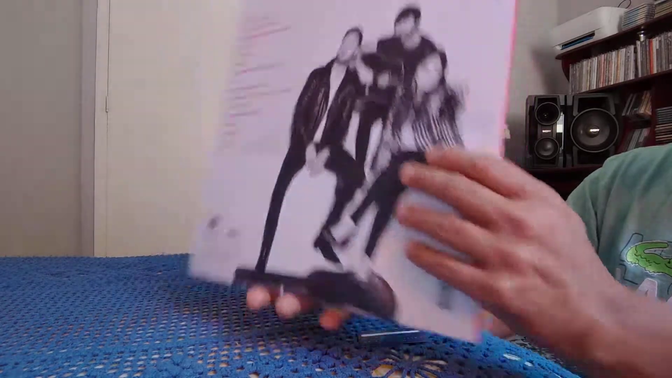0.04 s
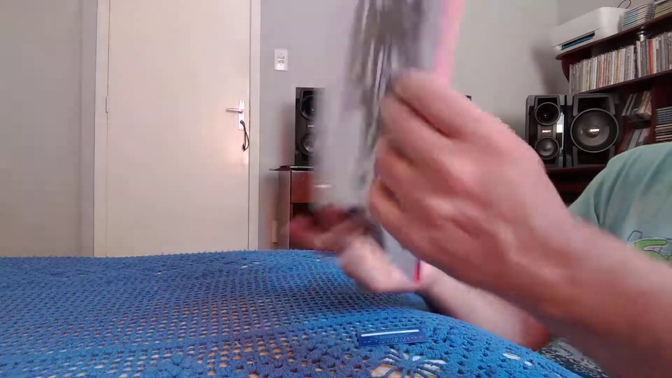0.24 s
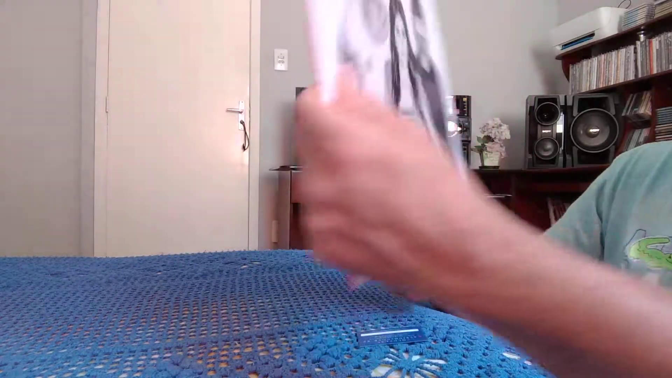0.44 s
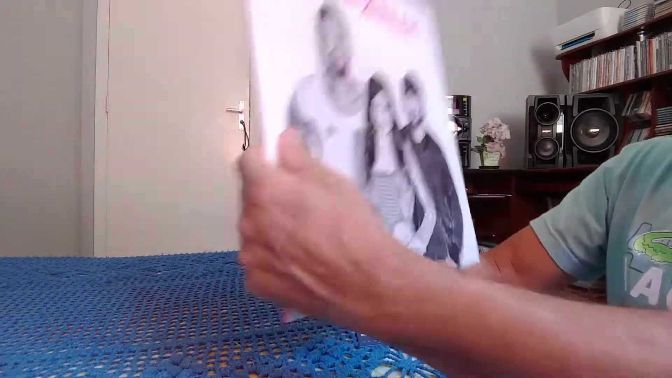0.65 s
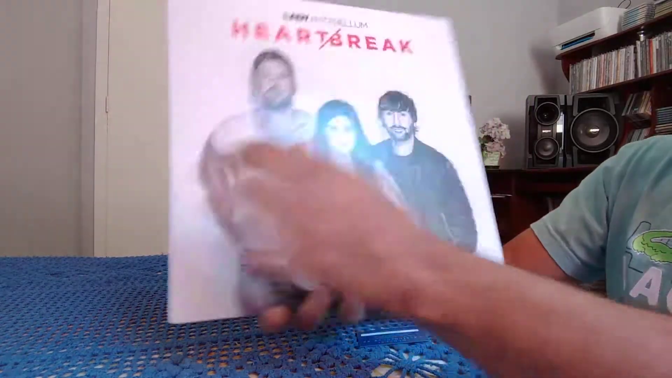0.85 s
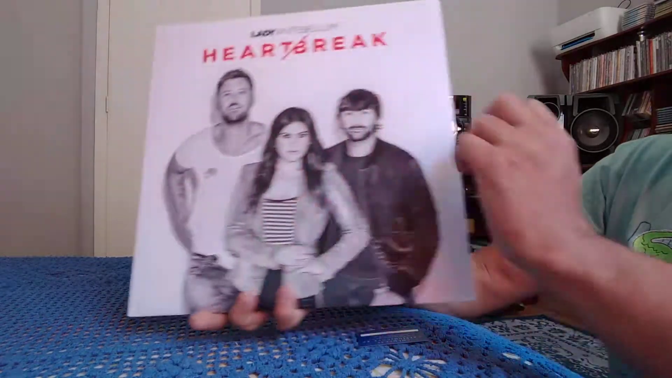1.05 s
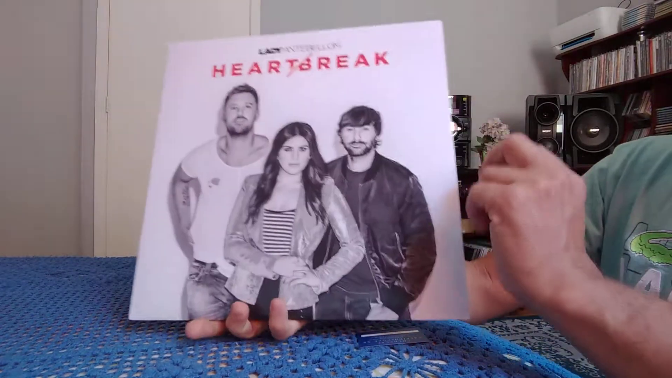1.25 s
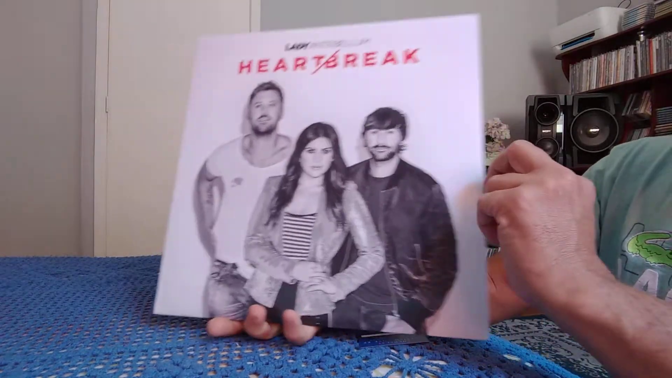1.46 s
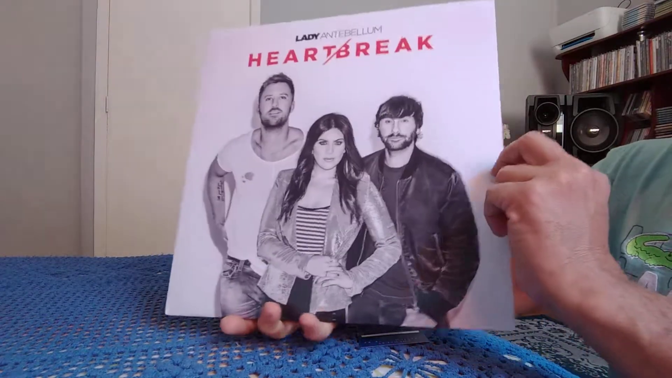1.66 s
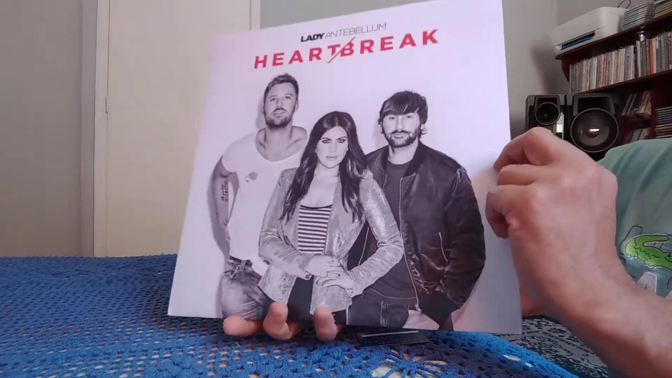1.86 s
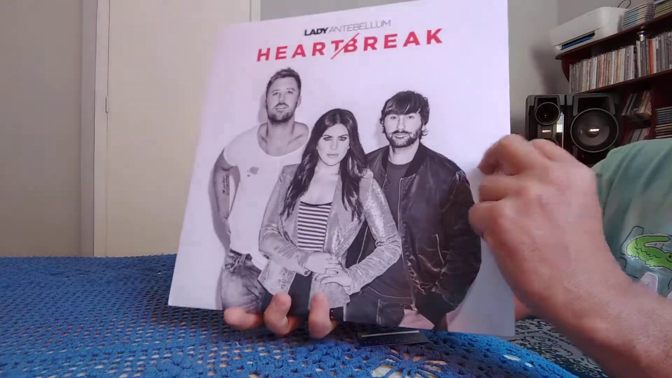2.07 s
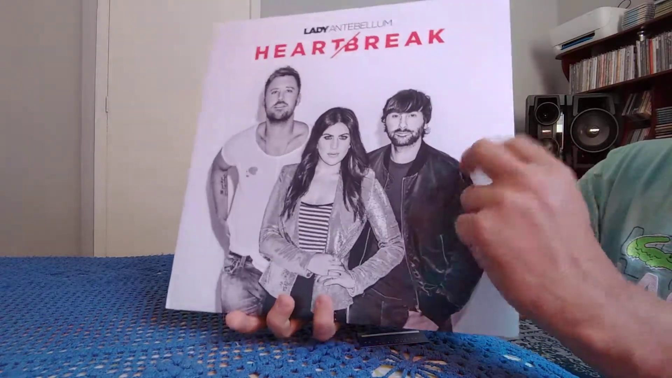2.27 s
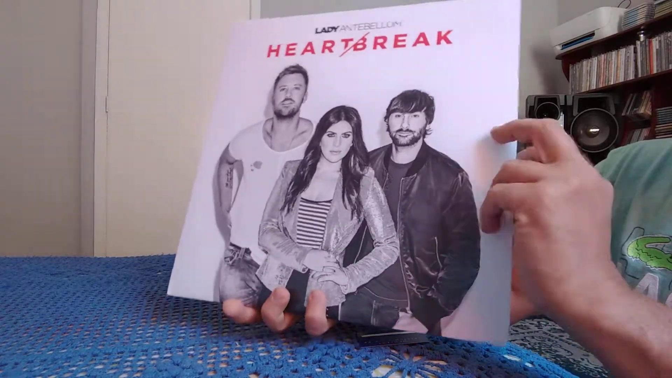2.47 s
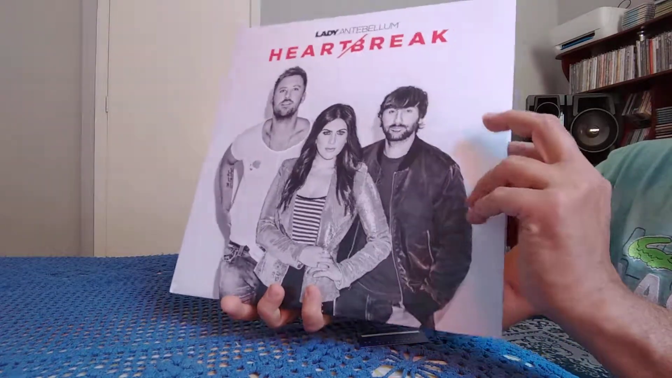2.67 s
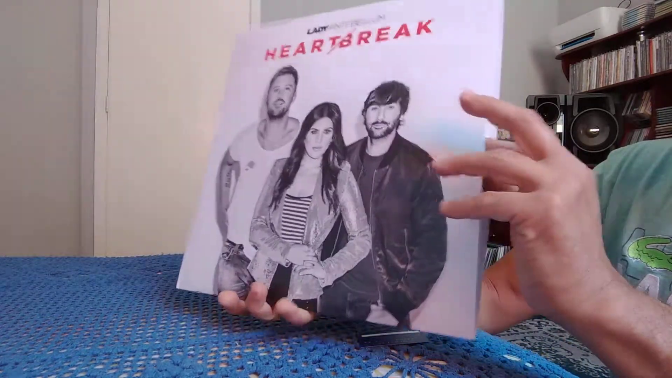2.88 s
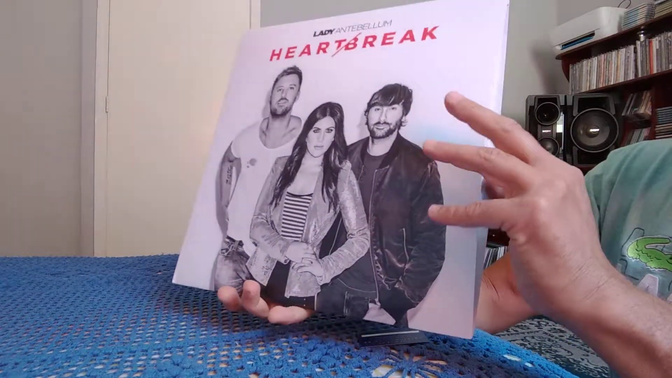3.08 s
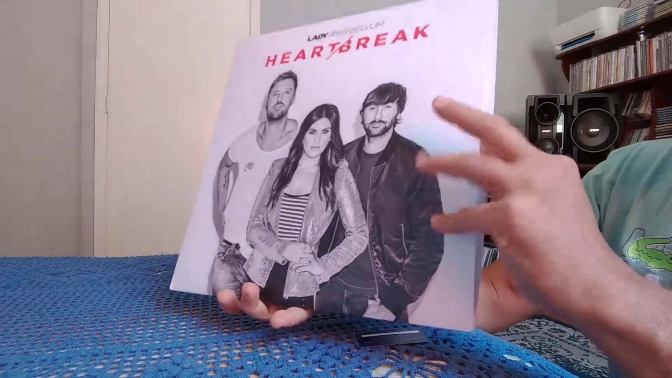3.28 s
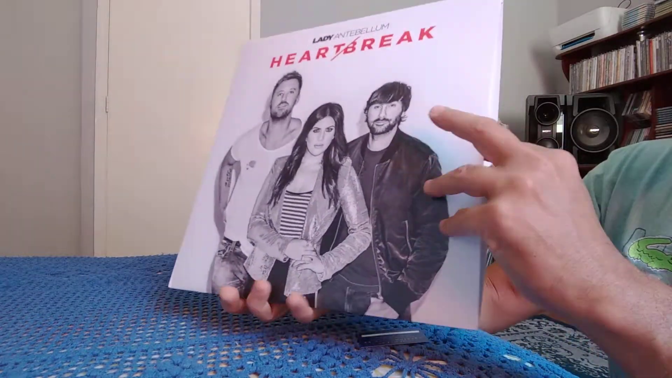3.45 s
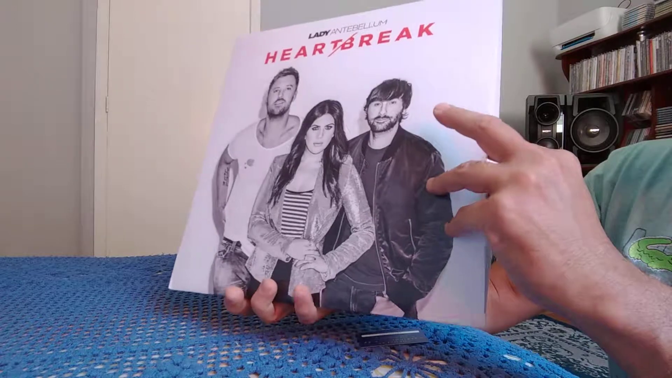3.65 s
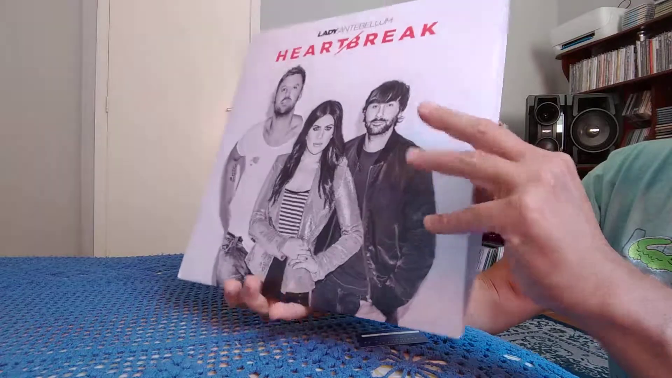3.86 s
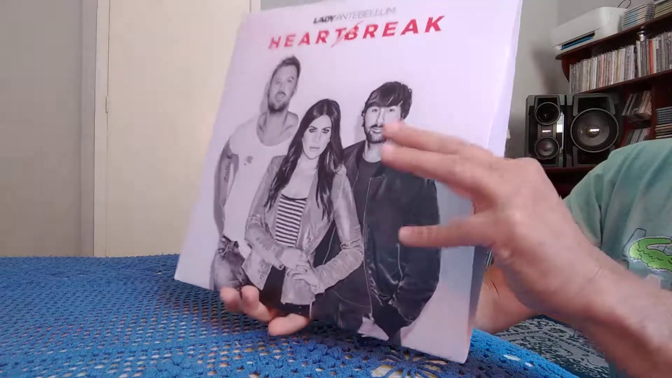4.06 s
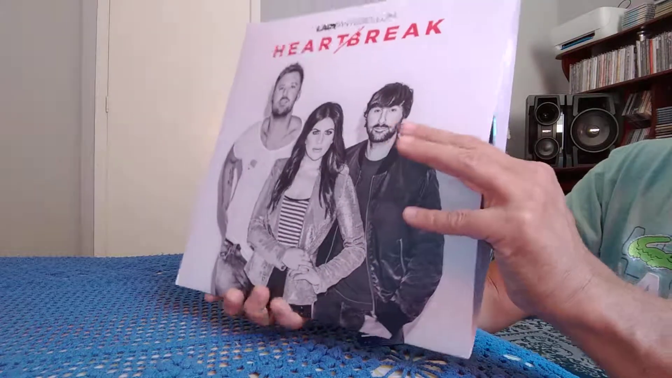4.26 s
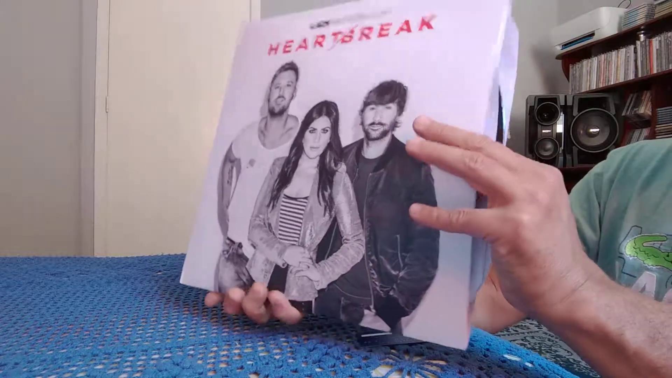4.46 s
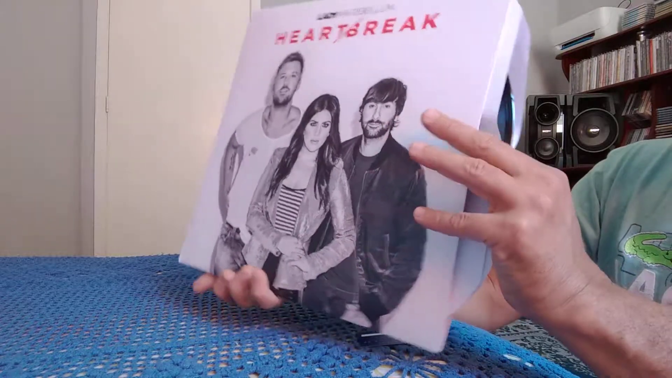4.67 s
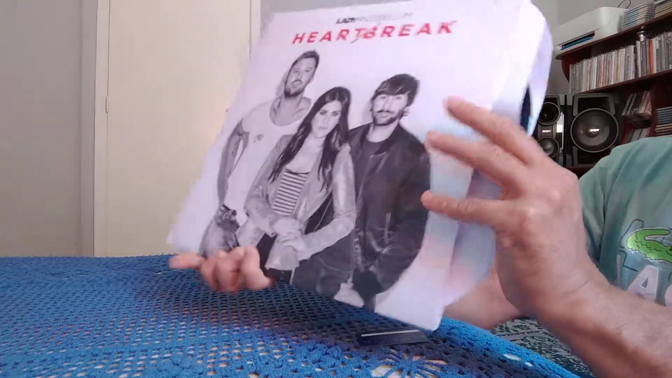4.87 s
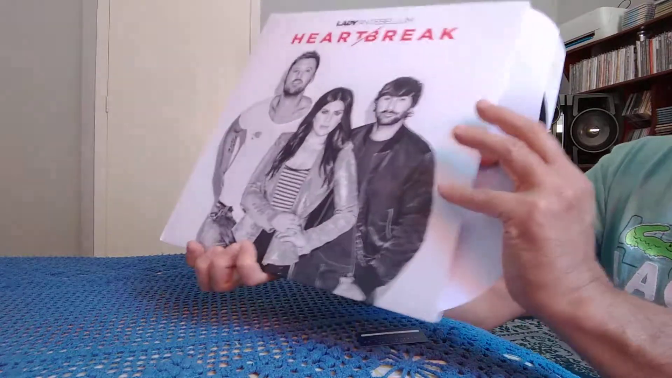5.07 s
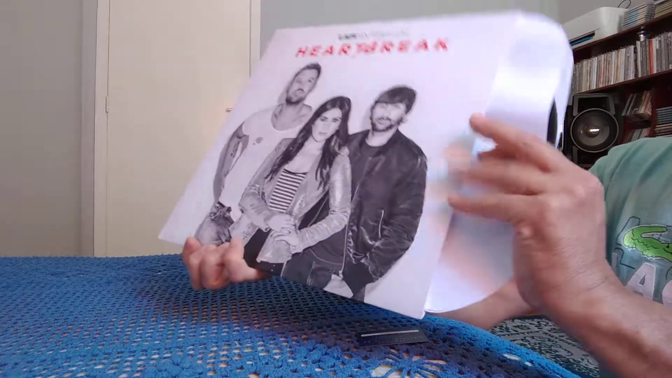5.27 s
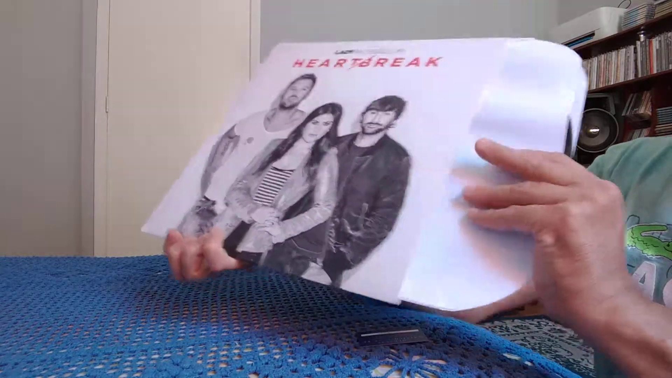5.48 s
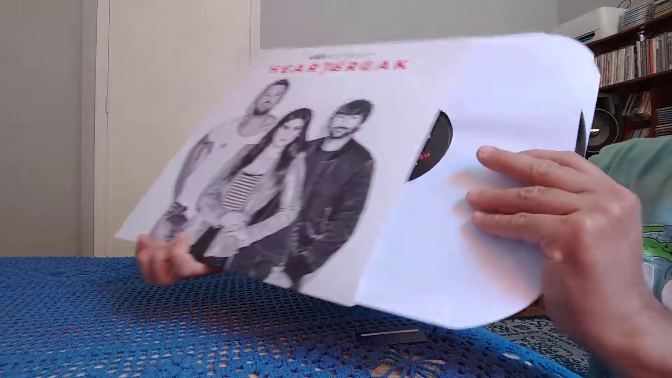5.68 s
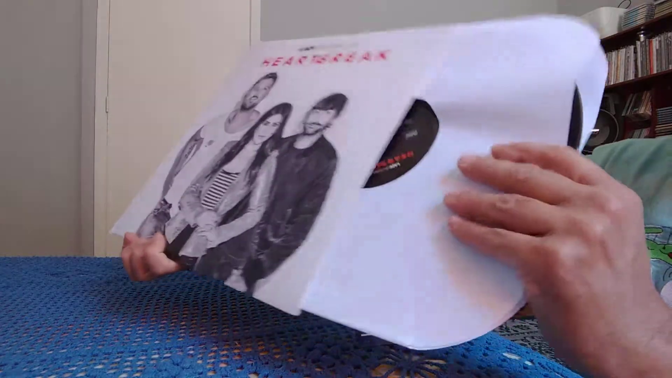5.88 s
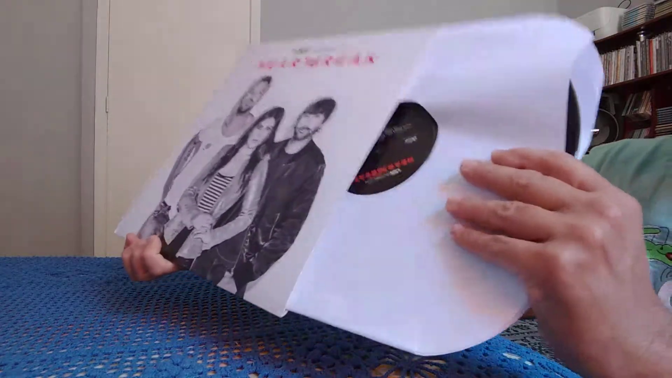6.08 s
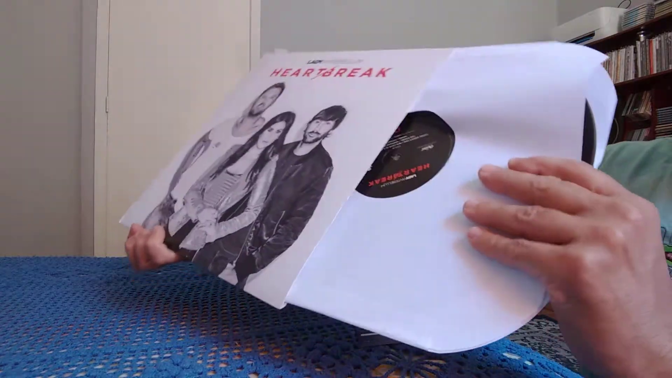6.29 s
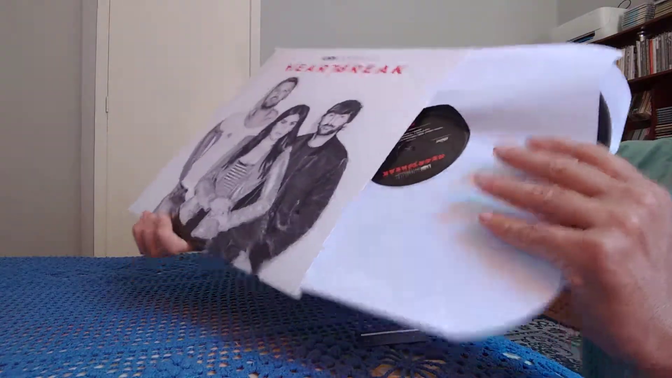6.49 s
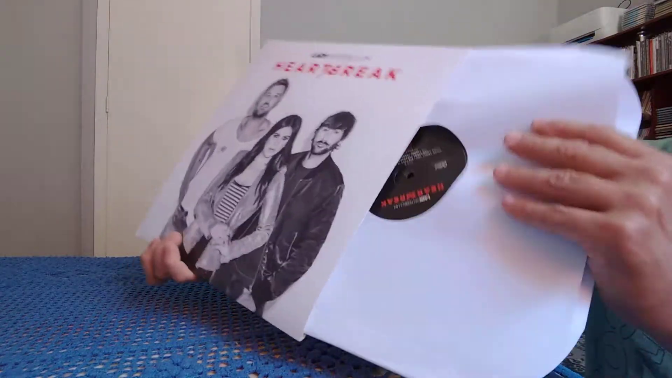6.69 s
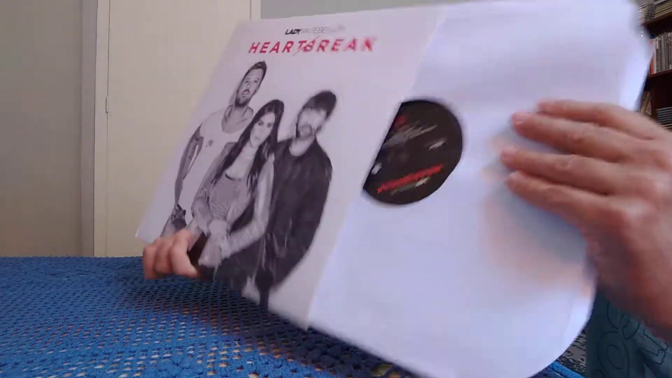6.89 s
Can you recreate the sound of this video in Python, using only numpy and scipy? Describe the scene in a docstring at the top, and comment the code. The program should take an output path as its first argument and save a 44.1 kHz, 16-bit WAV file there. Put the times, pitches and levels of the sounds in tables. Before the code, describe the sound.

Fingers rub and tap a cardboard record cover in a quiet room before the paper inner sleeve swishes out with crisp snaps.

```python
"""A cardboard record jacket is turned in the hands, then the record in its paper sleeve is drawn out.
Sliding friction makes the paper hiss; stick-slip under the fingers makes the card rasp and squeak.
Impacts and sudden releases excite the panel's damped modes as knocks and pops, and paper edges snap.
A small, quiet room hums and reverberates behind. Two close microphones feed a stereo widener."""
import sys
import numpy as np
from scipy import signal
from scipy.fft import rfft, irfft
from scipy.io import wavfile
from scipy.ndimage import uniform_filter1d

SR = 44100
rng = np.random.default_rng(int(sys.argv[2]) if len(sys.argv) > 2 else 0)


def log_audio(samples):
    """Write samples as a 16-bit WAV file to the path given in sys.argv[1]."""
    # one column per channel
    frames = np.atleast_2d(samples).T
    # limit to full scale, then quantise
    limited = np.clip(frames, -1, 1)
    pcm = np.round(limited * 32767).astype(np.int16)
    wavfile.write(sys.argv[1], SR, pcm)


N = 305613
TIME = np.arange(N) / SR
BINS_HZ = np.fft.rfftfreq(N, 1 / SR)

# strokes of fingers and paper over the jacket: start_s, rise_s, length_s, paper_db, card_db
STROKES = [(0, 0.0008, 0.3, -49, -84), (0.468, 0.18, 0.26, -49, -63.5), (0.763, 0.016, 0.32, -57, -76),
           (1.655, 0.039, 0.044, -48, -78), (1.722, 0.032, 0.061, -53.5, -69),
           (1.903, 0.018, 0.034, -39.5, -60), (2.025, 0.072, 0.11, -59, -62),
           (2.454, 0.045, 0.15, -64.5, -55.5), (2.799, 0.062, 0.14, -53, -56), (2.95, 0.02, 0.2, -61, -65),
           (3.133, 0.018, 0.21, -64, -59), (3.294, 0.19, 0.13, -58, -52.5), (3.71, 0.018, 0.88, -55, -53),
           (3.723, .008, 0.013, -50, -61), (3.845, 0.071, 0.14, -43, -45.5),
           (4.006, 0.26, 0.57, -53.5, -50.5), (4.369, 0.065, 0.099, -43.5, -47.5),
           (4.498, 0.056, 0.14, -49.5, -51.5), (4.634, 0.038, 0.094, -40.5, -47.5),
           (4.759, 0.013, 0.12, -51.5, -54.5), (4.891, 0.074, 0.071, -43.5, -43.5),
           (5.007, 0.017, 0.16, -37.5, -46.5), (5.183, 0.025, 0.18, -56, -52),
           (6.404, 0.071, 0.1, -45.5, -66), (6.454, 0.13, 0.16, -31.5, -73), (6.639, 0.061, 0.12, -39, -60),
           (6.798, 0.098, 0.15, -26, -69)]
# the long pull that draws the sleeve out: time_s, level_db
PULL = [(5.27, -74), (5.302, -43), (5.362, -32.5), (5.412, -37.5), (5.448, -34), (5.57, -39), (5.7, -44),
        (5.82, -45), (5.89, -39), (6.014, -47), (6.146, -43.5), (6.182, -40.5), (6.25, -44), (6.33, -77)]
# changing contact of the surfaces, weighting sheet hiss against fizz: time_s, gain_db
SHEET_CONTACT = [(0, -3.5), (4.0, 0), (5.1, 4.5), (5.9, 3.5), (6.93, -3)]
# spectral shapes of the sources: frequency_hz, relative_density_db
SHEET_SPECTRUM = [(300, -14), (900, -25.5), (1500, -10), (2000, -1), (2800, 3.5), (5000, -1.5), (6300, 2.5),
                  (9500, 3.5), (12000, 4.5), (15000, -3)]  # broad paper hiss
FIZZ_SPECTRUM = [(1000, -15.5), (5000, -32), (9000, -7), (12700, 7), (14500, 0)]  # fine treble fizz
SNAP_SPECTRUM = [(400, -23.5), (1500, -9.5), (3500, 2), (6000, -0.5), (9000, 1), (12500, 8), (15000, -4.5)]  # paper snaps and crackle
CARD_SPECTRUM = [(80, -4), (280, -2.5), (560, 1.5), (850, -3.5), (1150, -3), (1900, -1.5), (3500, -5.5),
                 (6000, -17.5), (14000, -19)]  # direct radiation of the panel
ARM_SPECTRUM = [(40, -11), (75, -3), (150, -4), (300, -10.5), (1000, -25)]  # rumble of the arms
AIR_SPECTRUM = [(38, -55), (50, 19), (72, -5), (150, 5), (220, -0.5), (450, -5), (1000, -12.5), (1800, -21),
                (3000, -14.5), (5000, -20), (9000, -22), (14000, -28.5)]  # room air and microphone hiss
# hollow resonance of the jacket, climbing as its mouth opens: time_s, pitch_hz
HOLLOW_PITCH = [(3.9, 1130), (4.7, 1470), (5.4, 1640), (6.2, 1330)]
# the jacket is swung or flexed: start_s, length_s, level_db
HEAVES = [(0.413, 0.37, -55), (3.13, 0.11, -55), (3.687, 0.48, -51.5), (4.93, 0.19, -46),
          (5.738, 0.075, -44.5), (6.622, 0.11, -44)]
# tones of the room's hum: pitch_hz, level_db
HUM_TONES = [(51, -68.5), (147, -66.5)]
# taps and snapping edges: start_s, knock_db, snap_db, decay_s, snap_tilt_db_per_octave
TAPS = [(0.379, -71, -58, 0.0012, -3), (1.275, -78, -50, 0.0009, 9), (1.912, -65, -44.5, 0.00071, -2),
        (2.012, -67, -46, 0.0024, -5), (3.135, -38.5, -58, 0.0028, 5), (3.717, -62, -44, 0.0012, 6),
        (3.8175, -40.5, -54, 0.006, 4), (3.912, -41.5, -35.5, 0.0051, 3), (5.781, -46, -30, 0.0053, 3),
        (5.808, -54, -46, 0.002, -6), (6.63, -40, -37.5, 0.0044, -3), (6.667, -50, -34, 0.0047, -2),
        (6.6753, -47, -33.5, 0.0024, -5.5), (6.762, -43.5, -39.5, 0.0016, -6.5)]
# modes of the jacket: pitch_hz, bandwidth_hz, relative_peak_db
JACKET_MODES = [(298, 51, 16), (450, 47, 12), (840, 41, 14), (1190, 110, 9), (1670, 99, 3)]
# the card catches and lets go, or rings on after a hard knock (3.136 s): start_s, pitch_hz, level_db
CATCHES = [(0.68, 1590, -47), (2.617, 1210, -39), (3.136, 874, -28.5), (3.563, 1330, -46.5),
           (3.683, 1250, -39.5), (3.874, 900, -34.5), (4.678, 1500, -35.5), (4.712, 1430, -29.5),
           (4.772, 474, -39), (4.952, 1390, -42), (5.06, 1450, -35), (5.178, 606, -38.5),
           (5.753, 1390, -40), (6.227, 1720, -30.5), (6.608, 1500, -35), (6.657, 1520, -37),
           (6.67, 302, -34.5)]
# fingertips squeak on the glossy cover: start_s, length_s, pitch_hz, level_db
SQUEAKS = [(1.52, .14, 3120, -70), (2.41, .17, 3250, -68), (2.69, .12, 3050, -69), (4.283, .04, 880, -55)]
# an edge scuffs the card: start_s, length_s, level_db
SCUFFS = [(1.923, 0.028, -52), (2.097, 0.036, -49), (2.81, 0.022, -62), (3.635, 0.075, -56),
          (3.863, 0.067, -41), (5.035, 0.063, -43), (6.51, 0.021, -43.5), (6.634, 0.1, -40)]
# reverberation time of the room: frequency_hz, t60_s
ROOM_DECAY = [(150, 0.22), (4000, 0.27), (13000, 0.032)]
# likeness of the two microphone signals: frequency_hz, coherence
MIC_COHERENCE = [(60, -0.025), (140, 0.24), (280, 0.4), (550, 0.67), (1100, 0.078), (2400, 0.24),
                 (5000, -0.045)]
# share of the opposite channel that the widener subtracts, before a cap: frequency_hz, share
CROSSFEED = [(100, 0.34), (400, 0.026), (1100, 0.97), (2300, 1), (3400, 0.21), (4700, 0.78), (7000, 0.18),
             (10000, 0.083), (14000, 0.025)]


def amp(db):
    """Converts decibels to an amplitude ratio."""
    return 10 ** (np.asarray(db) / 20)


def unit(x):
    """Normalises to rms 1."""
    return x / np.sqrt(np.mean(x ** 2) + 1e-20)


def over_hz(points, hz):
    """Interpolates a table on a log-frequency axis."""
    f, value = np.transpose(points)
    return np.interp(np.log(hz + 1), np.log(f + 1), value)


def convolve(x, response):
    """Convolves each channel with an impulse response, up to N samples."""
    return signal.oaconvolve(x, np.atleast_2d(response), axes=1)[:, :N]


def butterworth(x, hz, kind="high", order=1):
    """Butterworth filter, by default a gentle high-pass."""
    return signal.sosfilt(signal.butter(order, hz, kind, fs=SR, output="sos"), x)


def minimum_phase(spectrum):
    """Causal impulse response of energy 1, its phase given by the Hilbert transform."""
    log_gain = np.log(amp(over_hz(spectrum, abs(np.fft.fftfreq(2048, 1 / SR)))))
    response = np.fft.ifft(np.exp(np.conj(signal.hilbert(log_gain)))).real[:1024]
    return response / np.linalg.norm(response)


def hiss(spectrum, patch_db, patch_bins):
    """Two channels of shaped noise whose spectrum drifts in random patches."""
    hz, _, z = signal.stft(rng.standard_normal((2, N)), SR, nperseg=2048)
    patches = uniform_filter1d(rng.standard_normal(z.shape[1:]), size=patch_bins, axis=0)
    patches = unit(uniform_filter1d(patches, size=5, axis=1))
    z *= amp(over_hz(spectrum, hz)[:, None] + patch_db * np.clip(patches, -2, 2))
    return unit(signal.istft(z, SR, nperseg=2048)[1][:, :N])


def flutter(depth_db, samples):
    """Log-normal modulation, as from the uneven grip of two surfaces."""
    return unit(amp(depth_db * unit(uniform_filter1d(rng.standard_normal(N), samples))))


def grains(per_s, spread_db):
    """Fibres let go as a Poisson train of clicks of random size."""
    sizes = amp(spread_db * np.minimum(rng.exponential(1, N), 4)) * (rng.random(N) < per_s / SR)
    return unit(sizes * rng.standard_normal((2, N)))


def swell(start, length):
    """Half-sine envelope."""
    return np.sin(np.pi * np.clip((TIME - start) / length, 0, 1))


def stroke(start, rise, length, sag_db_per_s=20.5):
    """Friction noise follows speed: the hand accelerates, slows, then stops."""
    t = TIME - start
    speed_up = np.sin(np.pi / 2 * np.clip(t / rise, 0, 1)) ** 2
    stop_db_per_s = 230 + 17.5 / length  # a short flick stops more abruptly
    loss_db = sag_db_per_s * np.maximum(t - rise, 0) + stop_db_per_s * np.maximum(t - length, 0)
    return speed_up * amp(-loss_db)


def friction():
    """Incoherent sources add in power: strokes, pull and restless grip give the paper and card gains."""
    pull_db, grip_db = (2.5, -14), (-67, -67)  # each: paper, card
    shapes = [stroke(*row[:3]) for row in STROKES]
    pull = amp(np.interp(TIME, *np.transpose(PULL), left=-120, right=-120))
    shapes += [pull, flutter(depth_db=1.0, samples=5000)]
    levels_db = [row[3:] for row in STROKES] + [pull_db, grip_db]
    return np.sqrt(amp(levels_db).T ** 2 @ np.array(shapes) ** 2)


def paper_sliding(gain):
    """Sliding friction radiates broadband noise: sheet hiss, fine fizz and fibre crackle."""
    contact = amp(np.interp(TIME, *np.transpose(SHEET_CONTACT)) - 2.5)
    sheet = hiss(SHEET_SPECTRUM, patch_db=2.5, patch_bins=32) * contact
    fizz = hiss(FIZZ_SPECTRUM, patch_db=2.5, patch_bins=32) * amp(-0.5)
    crackle = convolve(grains(per_s=820, spread_db=-3.0), minimum_phase(SNAP_SPECTRUM)) * amp(-20)
    unsteady_hand = flutter(depth_db=0.9, samples=1400)
    return (sheet + fizz + crackle) * unsteady_hand * flutter(depth_db=1.1, samples=130) * gain


def hollow_resonance(x, hz, width_hz=660):
    """A damped resonator passes a band around its moving centre frequency."""
    carrier = np.exp(2j * np.pi * np.cumsum(hz) / SR)
    pole = np.exp(-np.pi * width_hz / SR)
    return 2 * (carrier * signal.lfilter([1 - pole], [1, -pole], x / carrier)).real


def card_rubbing(gain):
    """Stick-slip drives the panel and, with coarser snags, excites the jacket's hollow resonance."""
    slips = rng.standard_normal((2, N)) * flutter(depth_db=3.5, samples=600)
    panel = unit(convolve(butterworth(slips, hz=690), minimum_phase(CARD_SPECTRUM)))
    drive = slips + grains(per_s=200, spread_db=0.8)
    hz = np.interp(TIME, *np.transpose(HOLLOW_PITCH)) * flutter(depth_db=1.27, samples=1200)
    hollow = unit(hollow_resonance(hollow_resonance(drive, hz), hz))
    return (amp(-5.5) * panel + amp(-10) * hollow) * gain


def arm_rumble(rest_db=-62):
    """Slow motion of the arms gives low-frequency noise, swelling as the jacket is swung or flexed."""
    heaves = sum(amp(db) * swell(start, length) for start, length, db in HEAVES)
    return hiss(ARM_SPECTRUM, patch_db=3.5, patch_bins=10) * np.hypot(amp(rest_db), heaves)


def background():
    """The noise floor: room air, microphone hiss and a faint hum with random phase modulation."""
    drift = unit(uniform_filter1d(rng.standard_normal((2, N)), size=12000, axis=1))
    hum = sum(amp(db) * unit(np.sin(2 * np.pi * hz * TIME + drift)) for hz, db in HUM_TONES)
    return amp(-58) * hiss(AIR_SPECTRUM, patch_db=1.8, patch_bins=10) + hum


def jacket(force, ring_db):
    """Modal response: the card radiates each push at once, then rings in its damped modes."""
    t = np.arange(4096) / SR
    ring = sum(amp(db) * width * np.exp(-np.pi * width * t) * np.cos(2 * np.pi * hz * t)
               for hz, width, db in JACKET_MODES)
    response = amp(ring_db) * ring / np.linalg.norm(ring)
    response[:1024] += minimum_phase(CARD_SPECTRUM)
    return convolve(force, response / np.linalg.norm(response))


def tapping(push_s=0.00024, flick_s=0.0012):
    """Impact excitation: a push and a dying chatter of contacts knock the panel; the paper snaps."""
    knocks, snaps = np.zeros((2, 2, N + 4096))
    t = np.arange(2048) / SR
    push = t * np.exp(-t / push_s)  # the fingertip's weight flexes the whole panel
    for start, knock_db, snap_db, decay, tilt in TAPS:
        chatter = rng.standard_normal((2, len(t))) * np.sqrt(t) * np.exp(-t / decay)
        chatter /= np.linalg.norm(chatter, axis=1, keepdims=True)
        # the first contact stands out in a short flick
        tick = signal.unit_impulse(len(t), 12) * flick_s / (flick_s + decay)
        tilted = [(hz, db + tilt * np.log2(hz)) for hz, db in SNAP_SPECTRUM]
        snap = convolve(chatter + tick, minimum_phase(tilted))
        span = slice(round(start * SR), round(start * SR) + len(t))
        knocks[:, span] += amp(knock_db) * (chatter + amp(-2) * push / push.sum())
        snaps[:, span] += amp(snap_db) * snap[:, :len(t)]
    knocks = butterworth(knocks, hz=130)  # a light panel radiates little bass
    blows = jacket(knocks, ring_db=-16.5) + snaps[:, :N]
    return blows * np.sqrt(SR / 100)  # tap levels refer to energy spread over 10 ms


def catching(decay_cycles=1.8):
    """Free vibration: caught card lets go, or a hard knock sets it going, and it rings for a few cycles, while
    the slip scrapes the panel."""
    pops, slips = np.zeros((2, N))
    for start, hz, db in CATCHES:
        cycles = np.maximum(TIME - start, 0) * hz
        envelope = amp(db) * (1 - np.exp(-2 * cycles)) * np.exp(-np.minimum(cycles / decay_cycles, 20))
        pops += envelope * np.sin(2 * np.pi * cycles)
        slips += envelope
    return pops + amp(-0.5) * jacket(slips * rng.standard_normal((2, N)), ring_db=-8)


def squeaking():
    """Nearly periodic stick-slip of a fingertip gives a brief tone of unsteady pitch."""
    waver = 1 + 0.04 * unit(uniform_filter1d(rng.standard_normal(N), size=130))
    warped_time = np.cumsum(waver) / SR
    return sum(amp(db) * swell(start, length) * unit(np.sin(2 * np.pi * hz * warped_time))
               for start, length, hz, db in SQUEAKS)


def scuffing():
    """Forced vibration: an edge dragged over the card rasps and makes the panel shudder."""
    drag = rng.standard_normal((2, N))
    rasp = butterworth(drag, hz=[900, 4700], kind="band", order=2)
    shudder = butterworth(drag, hz=[230, 700], kind="band", order=2)
    envelope = sum(amp(db) * swell(start, length) for start, length, db in SCUFFS)
    return (unit(rasp) + amp(-6.5) * unit(shudder)) * flutter(depth_db=3.5, samples=80) * envelope


def directivity(x, right_over_left_db=6.5):
    """Only short waves are directional: the open edge sends its treble toward the right microphone."""
    gains = amp(np.array([[-right_over_left_db], [right_over_left_db]]) / 2)
    return x + butterworth(x, hz=3630) * (unit(gains) - 1)


def reverberation(x, level_db=-11):
    """The diffuse field of a small room decays exponentially, the high treble first."""
    hz, t, z = signal.stft(rng.standard_normal((2, SR // 2)), SR, nperseg=256)
    decay = amp(-60 * t / over_hz(ROOM_DECAY, hz)[:, None])
    tail = signal.istft(z * decay, SR, nperseg=256)[1]
    tail[:, :180] = 0  # gap before the first reflection
    return amp(level_db) * convolve(x, tail / np.linalg.norm(tail[0]))


def scene():
    """Handling and room sounds superpose at two microphones; mid and side weights set their coherence."""
    paper, card = friction()
    rubs = paper_sliding(paper) + card_rubbing(card) + scuffing() + squeaking()
    handling = directivity(rubs + catching() + arm_rumble() + tapping())
    left, right = rfft(handling + reverberation(handling) + background() * amp([[-.8], [.8]]))
    coherence = over_hz(MIC_COHERENCE, BINS_HZ)
    mid = (left + right) / 2 * np.sqrt(1 + coherence)
    side = (left - right) / 2 * np.sqrt(1 - coherence)
    return irfft(np.array([mid + side, mid - side]), N)


def record(dry, delay_s=0.000429, cutoff_hz=14300):
    """Comb filtering: a widener subtracts the delayed opposite channel; a low-pass limits the band."""
    spectrum = rfft(dry)
    share = np.clip(over_hz(CROSSFEED, BINS_HZ), 0, .94)
    opposite = spectrum[::-1] * np.exp(-2j * np.pi * BINS_HZ * delay_s)
    fade_in = np.minimum(TIME / .004, 1) ** 2
    wide = fade_in * irfft(spectrum - share * opposite, N)
    low_pass = signal.firwin(1023, cutoff_hz, window=("kaiser", 9), fs=SR)
    return signal.oaconvolve(wide, low_pass[None], "same")


dry = scene()
out = record(dry)
log_audio(out)
```